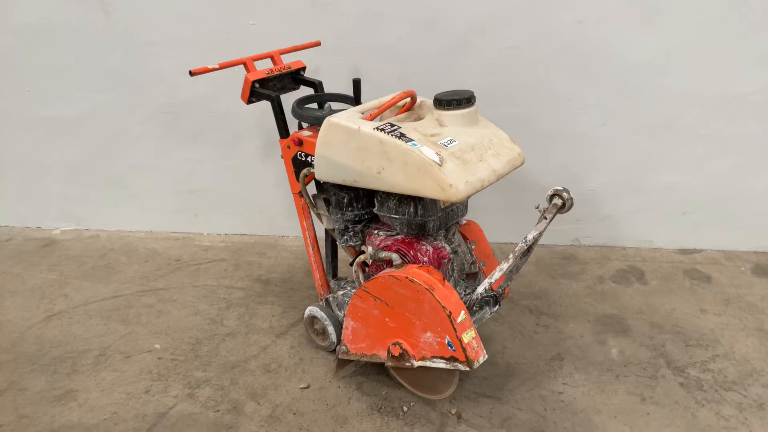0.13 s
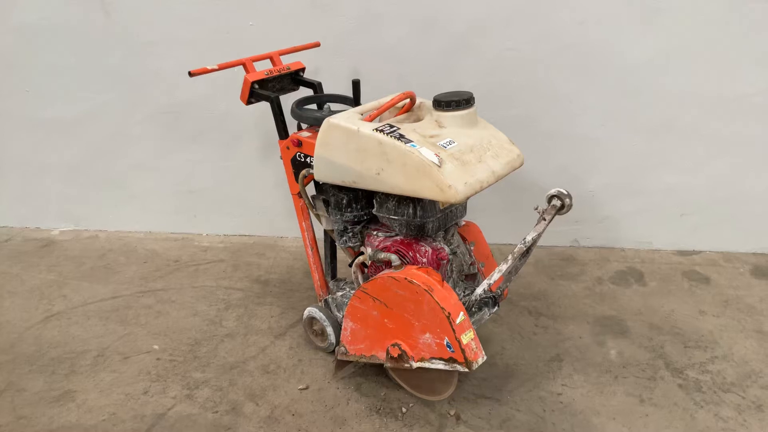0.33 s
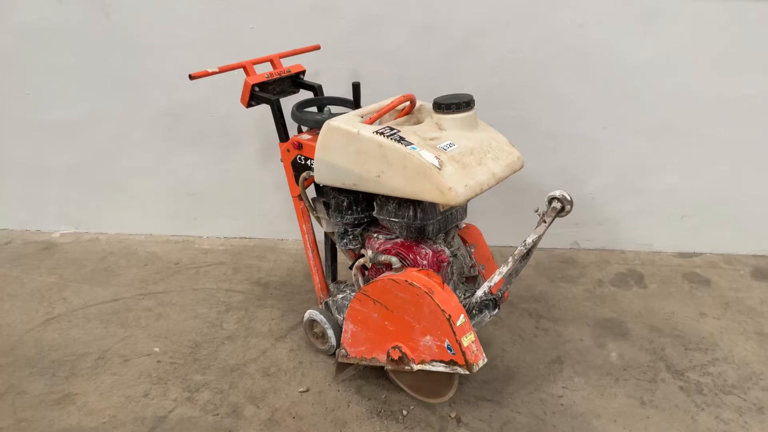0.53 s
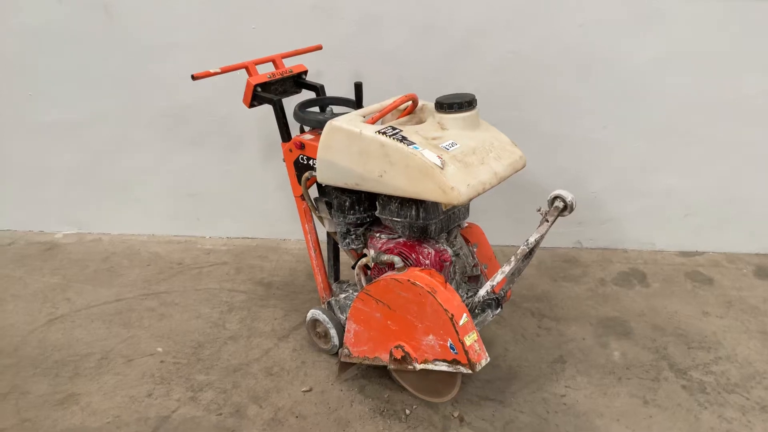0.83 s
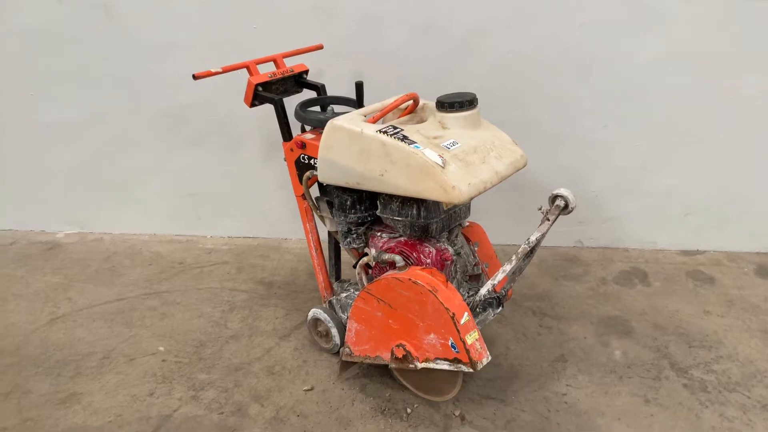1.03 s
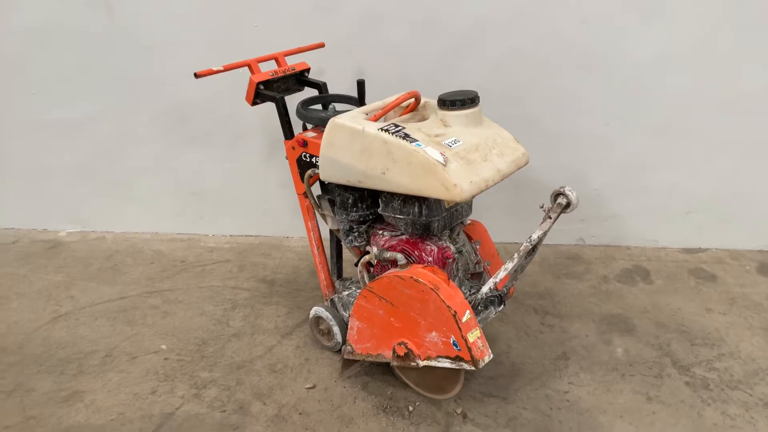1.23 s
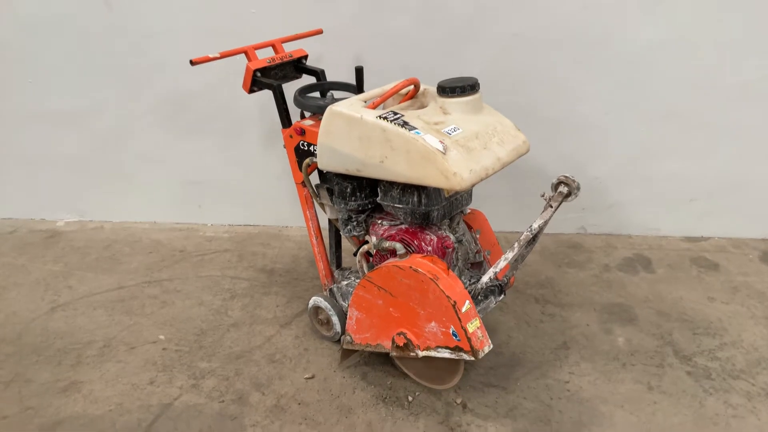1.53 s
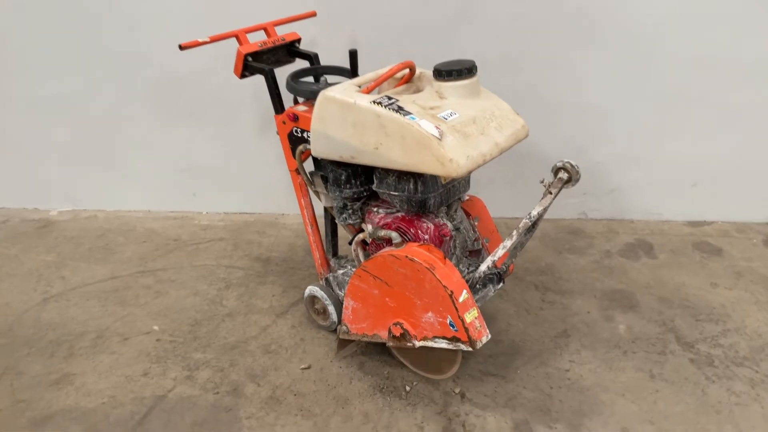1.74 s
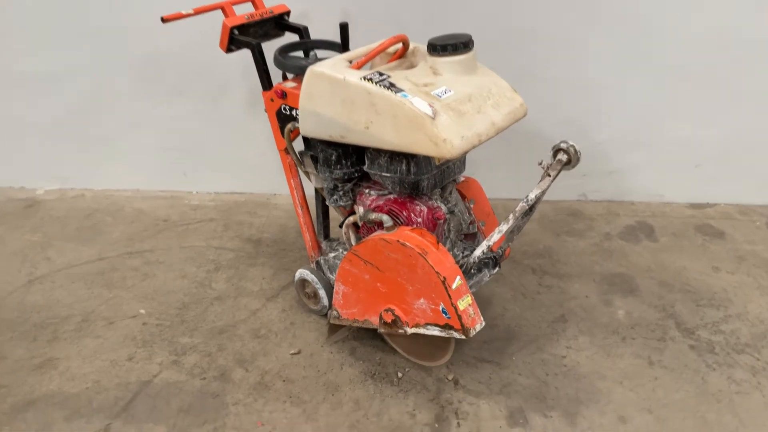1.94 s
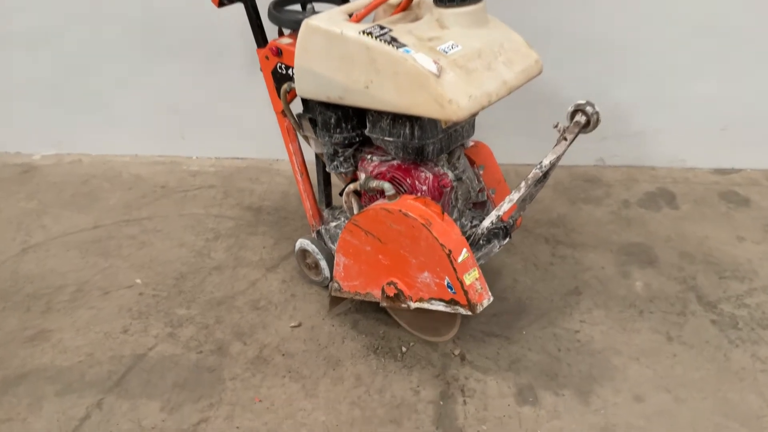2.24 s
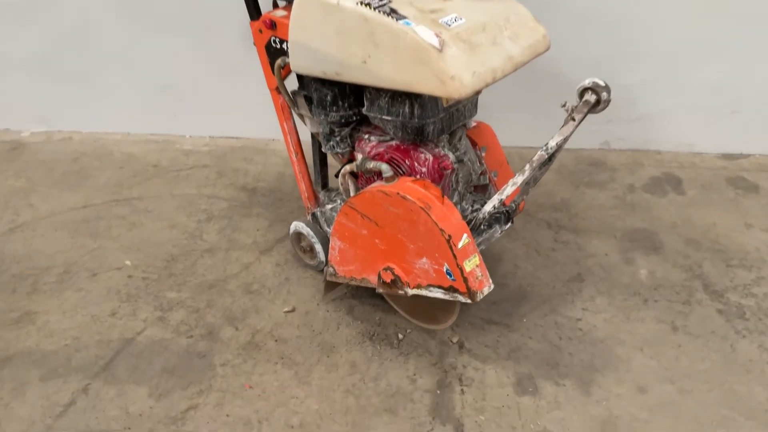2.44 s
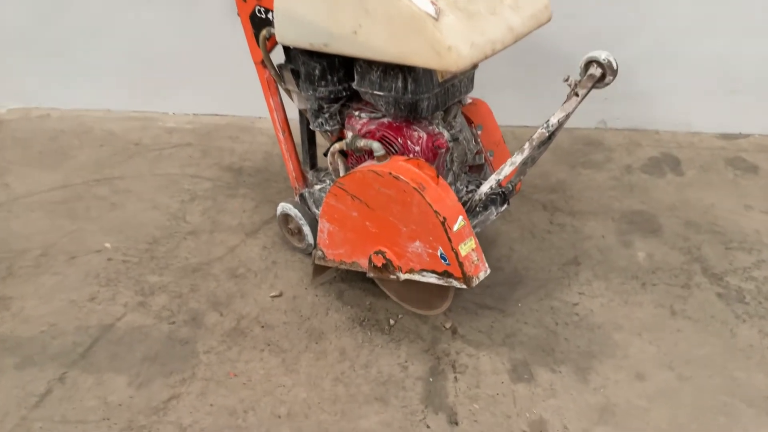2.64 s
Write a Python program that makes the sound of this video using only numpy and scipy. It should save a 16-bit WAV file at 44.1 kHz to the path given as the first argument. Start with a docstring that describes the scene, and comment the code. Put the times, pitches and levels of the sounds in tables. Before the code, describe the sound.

A small petrol engine on a floor saw runs at steady speed after a brief silence, droning and roaring with ringing steel; hollow and hissy at first, then plainer, in a bare concrete room, one microphone, mono.

```python
"""After a moment of silence a droning, roaring engine fades in, coloured in the low middle and top, then plainer.
It is the small single-cylinder four-stroke petrol engine of a floor saw at steady speed in a bare concrete hall.
Exhaust: sine orders of the firing rate. Roar of fan, valves and hall echo: patchy noise beating with the engine.
Steel blade and guard: noise through narrow resonances. Knocks: single low pushes.
A hollow resonance near 770 Hz, noise of uneven random level, is heard until the colour switches."""
import sys
import numpy as np
from scipy import signal
from scipy.fft import rfft, irfft, next_fast_len
from scipy.io import wavfile

SR = 44100
rng = np.random.default_rng(int(sys.argv[2]) if len(sys.argv) > 2 else 0)


def level_to_linear(level):
    """Convert decibel levels to linear amplitude factors, elementwise."""
    exponent = np.asarray(level, float) / 20
    return 10 ** exponent


def master(y):
    """Save y as 16-bit WAV."""
    cut = np.clip(np.atleast_2d(y).T, -1, 1)
    pcm = np.round(cut * 32767)  # scale
    wavfile.write(sys.argv[1], SR, pcm.astype(np.int16))


N = 122598
FIRING_HZ, A_FIRING_S = 30.1, .2382


def in_time(rows):
    """Columns joined by straight lines in time."""
    s, *columns = np.transpose(rows)
    return [np.interp(np.arange(N) / SR, s, c) for c in columns]


def rms_one(x):
    """Scaled to rms 1."""
    return x / np.sqrt(np.mean(x ** 2) + 1e-20)


def colour(x, points):
    """Filter by a (pitch_hz, gain_db) table, straight lines over log pitch."""
    hz = np.maximum(np.arange(N // 2 + 1) * SR / N, 1)
    p = np.array(points)
    gain_db = np.interp(np.log(hz), np.log(p[:, 0]), p[:, 1])
    return irfft(rfft(x) * level_to_linear(gain_db), N)


def band(x, low_hz, high_hz):
    """Band-pass."""
    return signal.sosfilt(signal.butter(2, [low_hz, high_hz], "band", fs=SR, output="sos"), x)


def drift(rate_hz):
    """Slow random wander of rms 1: noise through two equal low-pass poles, every 40 samples."""
    r = np.exp(-2 * np.pi * rate_hz * 40 / SR)
    noise = rng.standard_normal(N // 40 + 2002)
    slow = signal.lfilter([1], [1, -2 * r, r * r], noise)[2000:]
    return np.interp(np.arange(N) / 40, np.arange(len(slow)), rms_one(slow - slow.mean()))


STEEL_EVENNESS = .35


def sung(hz, width_hz):
    """Noise through a narrow resonance, its random level partly evened if under 30 Hz wide; rms 1."""
    r = np.exp(-np.pi * width_hz / SR)
    noise = rng.standard_normal(N + 8000)
    poles = [1, -2 * r * np.cos(2 * np.pi * hz / SR), r * r]
    rung = rms_one(signal.lfilter([1, 0, -1], poles, noise)[8000:])  # settled part
    envelope = np.abs(signal.hilbert(rung, next_fast_len(N))[:N])
    evenness = STEEL_EVENNESS * (width_hz < 30)
    return rms_one(rung / (envelope + .2) ** evenness)


# uneven, chance-like level of the hollow resonance, before trim: time_s, level_db
HOLLOW_LEVEL = [(0.13, -16), (0.14, -10.5), (0.244, -23), (0.28, -12.5), (0.346, -29), (0.4, -8),
                (0.414, -40), (0.462, -17), (0.478, -12), (0.524, -13), (0.562, -9.5), (0.582, -18.5),
                (0.696, -12.5), (0.72, -20), (0.748, -11.5), (0.786, -24), (0.842, -11), (0.93, -28)]
HOLLOW_HZ, HOLLOW_WIDTH_HZ, HOLLOW_TRIM_DB = 770, 85, -3.5


def hollow_resonance():
    """Noise through one resonance, at an uneven level."""
    level_db, = in_time(HOLLOW_LEVEL)
    return level_to_linear(level_db + HOLLOW_TRIM_DB) * sung(HOLLOW_HZ, HOLLOW_WIDTH_HZ)


TICKS_PER_S, TICK_SPREAD_DB, TICK_POWER_SHARE = 3000, 3.5, 0.079


def clatter():
    """Air noise mixed with dense ticks of loose metal: random signs and sizes, white, rms about 1."""
    size_db = TICK_SPREAD_DB * np.minimum(rng.exponential(1, N), 5)
    sizes = level_to_linear(size_db) * rng.choice([-1, 1], N)
    ticks = rms_one(sizes * (rng.random(N) < TICKS_PER_S / SR))
    air = rng.standard_normal(N)
    return np.sqrt(1 - TICK_POWER_SHARE) * air + np.sqrt(TICK_POWER_SHARE) * ticks


# roar spectrum, relative: pitch_hz, density_db (per Hz)
ROAR_SPECTRUM = [(52, -37), (88, -21), (125, -11), (192, -12), (284, -4.5), (345, -10.5), (458, -3),
                 (499, -2), (620, -4.5), (770, -0.5), (840, -6), (1240, -2.5), (1350, -5), (1680, -7.5),
                 (2090, 0.5), (2280, -0.5), (2650, -9), (2890, -6.5), (4180, -8.5), (5540, -15),
                 (6450, -13.5), (8190, -19), (9330, -16), (11600, -23), (15700, -37)]
PATCHY_DB, SHARED_PATCH = 0.67, .9
# beat depths 0-1, full in patches starting above BEAT_FULL_HZ
BEAT_FULL_HZ, BEAT_FIRING, BEAT_TURN = 3140, 0.13, 0.099


def roar(cycle_rad):
    """Noise in half-octave patches of wandering level; beats per firing and per turn, most in the treble."""
    bins = rfft(colour(clatter(), ROAR_SPECTRUM))
    hz = np.arange(len(bins)) * SR / N
    edges_hz = 30 * 2 ** np.arange(0, 9.6, .5)
    shared = drift(18.0)
    # two turns per firing
    beat = BEAT_FIRING * np.cos(cycle_rad - 4.3) + BEAT_TURN * np.cos(2 * cycle_rad - 1.7)
    out = 0
    for low, high in zip(edges_hz, edges_hz[1:]):
        patch = irfft(bins * ((hz >= low) & (hz < high)), N)
        wander_db = PATCHY_DB * (SHARED_PATCH * shared + drift(7.4))
        out = out + patch * level_to_linear(wander_db) * (1 + beat * min(1, low / BEAT_FULL_HZ))
    return rms_one(out)


# low pops among the firings, before the microphone: centre_s, peak_db
KNOCK_TIMES = [(.2385, -23), (.388, -28), (.621, -25), (.755, -34), (0.806, -33)]
KNOCK_WIDTH_S = 0.0028  # centre to peak


def knocks():
    """Single N-shaped low pushes: slope of a Gaussian, peak 1 before level."""
    t = np.arange(N) / SR
    out = 0
    for centre_s, peak_db in KNOCK_TIMES:
        u = (t - centre_s) / KNOCK_WIDTH_S
        out = out + level_to_linear(peak_db) * u * np.exp(.5 - .5 * u ** 2)
    return out


# modes of blade and guard: pitch_hz
MODE_HZ = [785, 968, 1263, 2030, 2149, 2405, 2445, 2661, 2690, 2731, 3680, 4070, 4190, 4350, 4870]
# the same modes, level against the run level: width_hz, level_db
MODES = [(26, -24.5), (20, -19), (37.8, -16.5), (68, -14.5), (12.3, -11), (12.3, -12.5), (13, -12.5),
         (6.76, -7.5), (9, -14), (8.1, -13), (90, -19), (50, -17), (70, -26), (90, -13), (70, -15.5)]


def steel():
    """Each mode of blade and guard sings as noise through its resonance."""
    return sum(level_to_linear(level_db) * sung(pitch_hz, width_hz)
               for pitch_hz, (width_hz, level_db) in zip(MODE_HZ, MODES))


# exhaust orders, relative: firing_multiple, level_db
EXHAUST_ORDERS = [(1, -33), (2, 3.5), (3, -58), (4, 2.5), (5, -3), (6, -4), (7, -5.5), (8, -2), (9, -0.5),
                  (10, -4.5), (11, -4), (12, -6), (13, -15), (14, -1)]
# drone level, before trim: time_s, level_db
DRONE_LEVEL = [(0.17, -29), (0.25, -25), (0.26, -29.5), (0.59, -30), (0.62, -31), (0.65, -30.5),
               (0.92, -32.5), (0.96, -29), (1.9, -34), (2.75, -34.5)]
DRONE_TRIM_DB = -2
IN_STEP_UP_TO, PULSE_SPREAD_RAD, PULSE_TILT_RAD = 8, .5, -.35
FULL_WAVER_ORDER, WAVER_DB, WAVER_RAD = 9, 2.2, .75


def exhaust(cycle_rad):
    """Sine orders of the firing pulse; higher ones fall out of step and waver more in level and phase."""
    out = 0
    for order, order_db in EXHAUST_ORDERS:
        k = round(order)
        loose = min(1, (k / FULL_WAVER_ORDER) ** 2)
        level_db = order_db + loose * WAVER_DB * drift(10.4)
        lag_rad = PULSE_SPREAD_RAD * max(0, k - IN_STEP_UP_TO) ** 2
        waver_rad = loose * WAVER_RAD * drift(1.9)
        out = out + level_to_linear(level_db) * np.sin(k * cycle_rad - lag_rad + PULSE_TILT_RAD + waver_rad)
    drone_db, = in_time(DRONE_LEVEL)
    return level_to_linear(DRONE_TRIM_DB + drone_db) * out


# run level, shared by roar and steel: time_s, level_db
RUN_LEVEL = [(0.17, -15.5), (0.24, -14.5), (0.49, -15.5), (0.5, -18.5), (0.52, -14), (0.58, -17),
             (0.63, -13.5), (0.71, -17.5), (0.89, -19.5), (0.93, -15.5), (1.14, -15), (1.35, -17.5),
             (1.88, -18.5), (1.91, -19.5), (2.76, -19), (2.78, -19.5)]
ROAR_TRIM_DB = 1


def scene():
    """The machine as it reaches the microphone, the same in both channels."""
    run_db, = in_time(RUN_LEVEL)
    cycle_rad = 2 * np.pi * FIRING_HZ * (np.arange(N) / SR - A_FIRING_S)
    noisy = level_to_linear(run_db) * (level_to_linear(ROAR_TRIM_DB) * roar(cycle_rad) + steel())
    mono = noisy + knocks() + exhaust(cycle_rad)
    return np.array([mono, mono])


# first microphone colour: pitch_hz, gain_db
EARLY_COLOUR = [(50, -3), (150, 0), (350, -3), (500, 0.5), (760, 3.5), (900, 7.5), (1150, 4), (1500, 2),
                (2000, 0), (2700, -1), (3600, -3), (4600, -3), (5600, -3.5), (6500, 0), (7200, 2),
                (7900, 10.5), (8500, 7), (9500, 7.5), (10600, 9), (12000, 7.5), (14000, 8.5), (16000, 8)]
# gain of the low middle in that colour: time_s, gain_db
LOW_MIDDLE_GAIN = [(.15, -1.5), (.3, 1), (.42, -2), (.55, -0.5), (.69, 2), (.71, -1.5), (.82, 1), (.848, 1),
                   (.87, -6), (.93, -1)]
LOW_MIDDLE_HZ = 594, 1360
# gain of the treble in that colour: time_s, gain_db
TREBLE_GAIN = [(.15, -1.5), (.5, 0.5), (.7, -1), (.85, 1), (.93, -0.5)]
TREBLE_HZ = 6460, 16000


def first_colour(x):
    """Microphone favouring low middle and top, both bands moving in level."""
    first = colour(x, EARLY_COLOUR)
    middle_db, = in_time(LOW_MIDDLE_GAIN)
    first = first + (level_to_linear(middle_db) - 1) * band(first, *LOW_MIDDLE_HZ)
    treble_db, = in_time(TREBLE_GAIN)
    return first + (level_to_linear(treble_db) - 1) * band(first, *TREBLE_HZ)


def low_pass(x):
    """Removes everything above the highest recorded frequency."""
    return signal.sosfilt(signal.butter(12, 16570, fs=SR, output="sos"), x)


SWITCH_S, SWITCH_LENGTH_S = 0.923, 0.018
START_S, START_DB, FADE_S = .12, -9, 0.048
PASS_HZ = 42, 15740


def record(dry):
    """One microphone: first colour, crossfade to plain, rounded peaks, fade-in, both spectrum ends cut."""
    t = np.arange(N) / SR
    first = first_colour(dry[0]) + hollow_resonance()
    later = np.clip((t - SWITCH_S) / SWITCH_LENGTH_S + .5, 0, 1)
    x = (1 - later) * first + later * dry[0]
    x = 1.33 * np.tanh(x / 1.253)
    rise = np.clip((t - START_S) / FADE_S, 0, 1)
    x = x * (t >= START_S) * (level_to_linear(START_DB) + (1 - level_to_linear(START_DB)) * rise)
    x = signal.sosfilt(signal.ellip(14, .5, 80, PASS_HZ[1], fs=SR, output="sos"), x)
    x = signal.sosfilt(signal.butter(2, PASS_HZ[0], "high", fs=SR, output="sos"), x)
    return low_pass(np.array([x, x]))


dry = scene()
out = record(dry)
master(out)
```